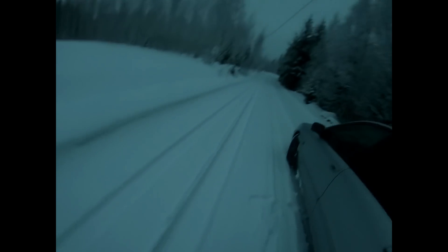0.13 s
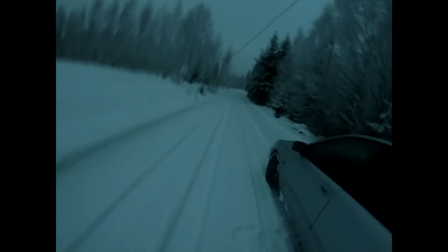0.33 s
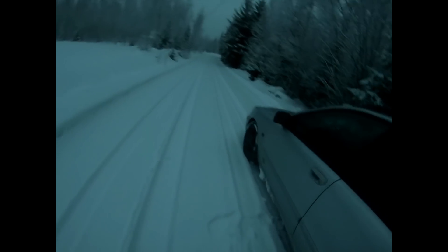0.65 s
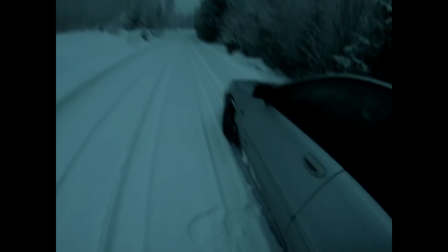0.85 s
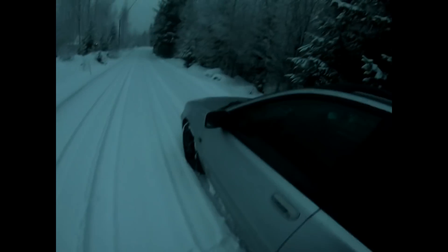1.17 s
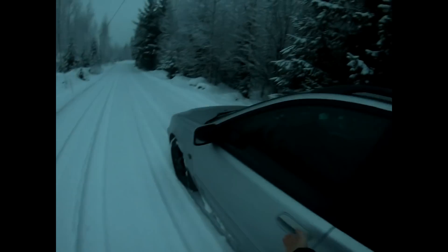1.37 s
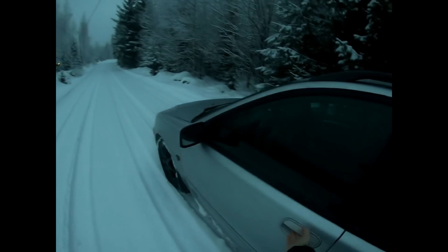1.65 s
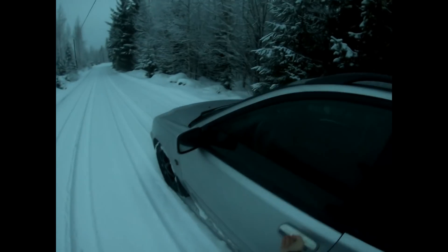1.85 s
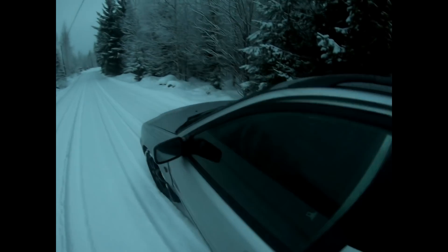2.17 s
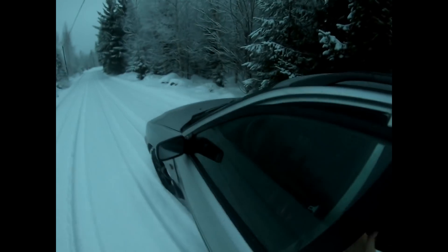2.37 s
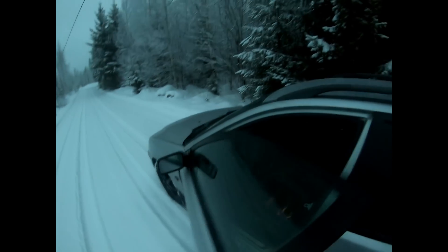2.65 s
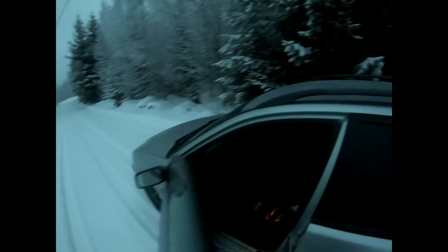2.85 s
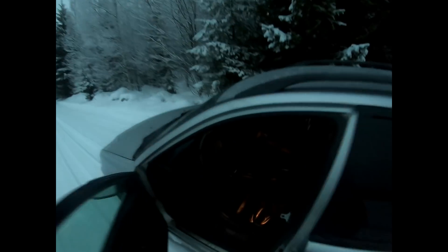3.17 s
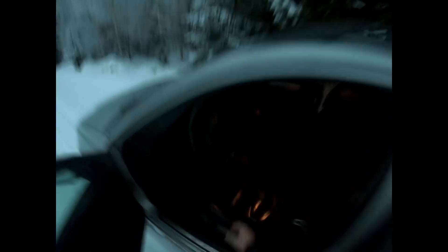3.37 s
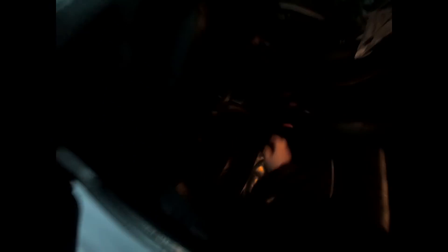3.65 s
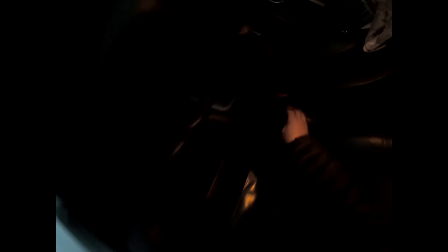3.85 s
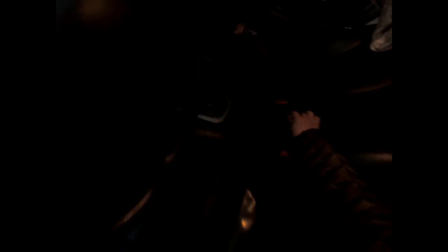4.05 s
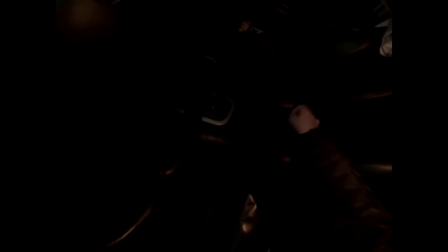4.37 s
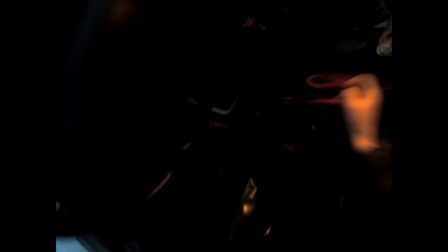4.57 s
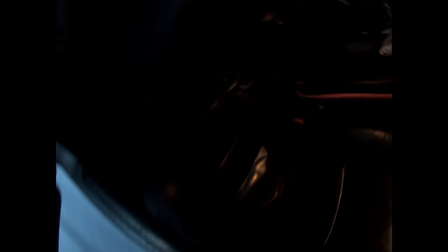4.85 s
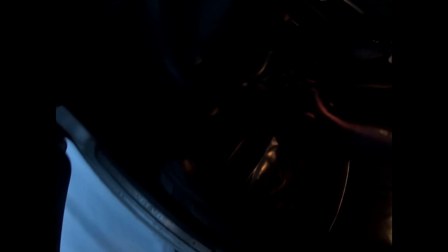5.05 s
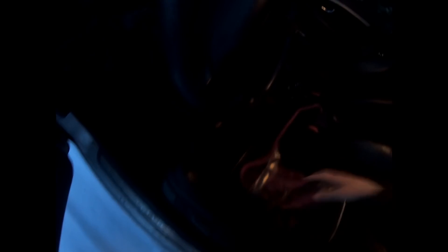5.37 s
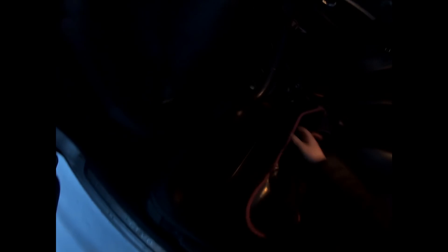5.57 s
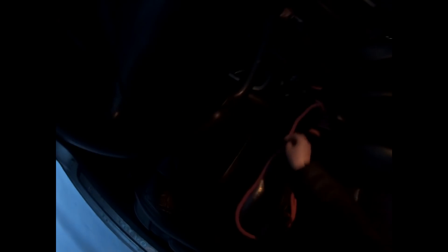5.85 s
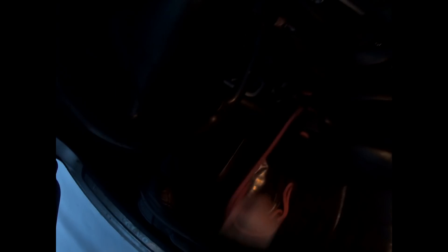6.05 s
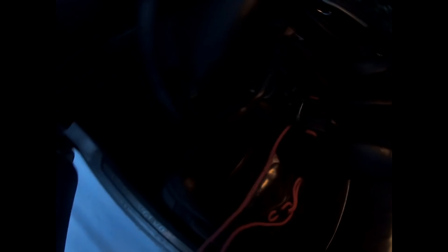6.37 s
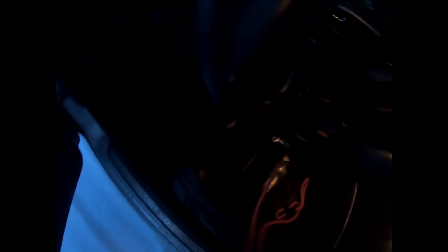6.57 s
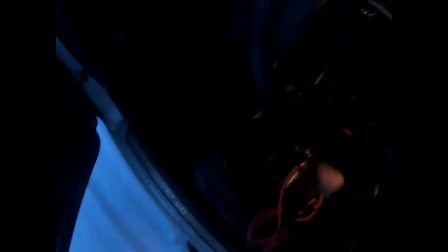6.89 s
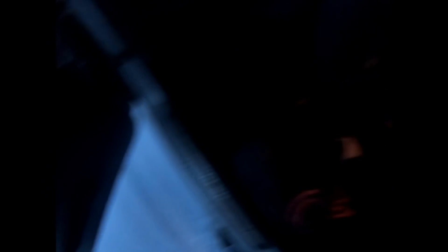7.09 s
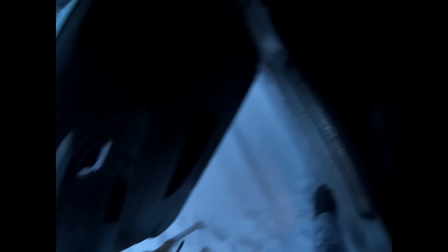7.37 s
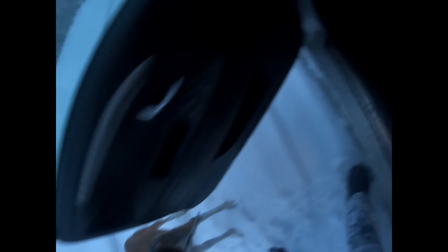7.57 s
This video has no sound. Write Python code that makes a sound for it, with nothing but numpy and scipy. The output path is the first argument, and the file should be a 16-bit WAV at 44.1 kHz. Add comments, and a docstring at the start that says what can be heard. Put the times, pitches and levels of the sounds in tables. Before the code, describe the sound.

Soft steps in snow and a swishing jacket are heard close on a body-worn microphone, with low rumble from each movement and very quiet surroundings. A dog gives faint, high whimpers at about 0.2 and 1 second. At 2 seconds a car door handle clunks, and at 2.3 the latch releases with a sharp click and a short boom. From 2.8 to 3.4 seconds the dog whines in a thin, wavering whistle, slightly to the right, while the door groans faintly. The jacket rustles more strongly around 4 seconds. From 4.4 seconds paws and a lead knock and scrape busily on the car's trim and floor, loudest near 4.8 and in a dull double thump at 5.6. The lead's metal clasp jingles from 6.3 to 6.9 seconds. Faint whimpers follow between 7 and 7.5 seconds, then one last clink.

```python
"""On a snowy forest road, someone wearing a camera walks to a car, pulls the door open and leans in.
A dog whines through its nose in high, nearly pure whistles. Steps, paws and lead strike trim and floor
into damped resonance, the door skin booms, and the lead's metal clasp jingles in the footwell.
Friction makes the jacket swish, and the camera mount carries every move to the microphones as rumble."""
import sys
import numpy as np
from scipy import signal
from scipy.io import wavfile
from scipy.ndimage import uniform_filter1d

SR = 44100
rng = np.random.default_rng(int(sys.argv[2]) if len(sys.argv) > 2 else 0)


def wav_record(signal):
    """Record a signal, one row per channel, as 16-bit PCM in the file named by sys.argv[1]."""
    frames = np.transpose(np.atleast_2d(signal))
    bounded = np.clip(frames, -1, 1)
    # unit amplitude maps onto the largest positive 16-bit level
    quanta = np.round(bounded * 32767).astype(np.int16)
    wavfile.write(sys.argv[1], SR, quanta)


N = 340893

# the side on which the action lies: (time [s], left minus right [dB])
BALANCE = [(0, -4.5), (2, -12), (2.9, -17.5), (3.4, -10), (4.4, -1), (7.73, -3)]


def dog():
    """Nasal whistling: a long whine, amplitude-modulated into throbs midway, and shorter whimpers."""
    # the long whine: (time [s], pitch [Hz], level [dB])
    whine = [(2.858, 4590, -64), (2.872, 4500, -54), (2.938, 4503, -49), (2.982, 4385, -63),
             (3.019, 4420, -62), (3.095, 4675, -56), (3.136, 4630, -54), (3.168, 4490, -44),
             (3.190, 4520, -46), (3.206, 4710, -48), (3.234, 4640, -51), (3.245, 4590, -68),
             (3.275, 4500, -54), (3.31, 4433, -43), (3.336, 4435, -42.5), (3.352, 4627, -46),
             (3.378, 4700, -43), (3.394, 4580, -48), (3.41, 4589, -44), (3.43, 4630, -80)]
    # an early, wavering whine: (time [s], pitch [Hz], level [dB])
    waver = [(0.998, 4560, -72), (1.046, 4432, -61), (1.076, 4474, -65), (1.094, 4498, -59),
             (1.116, 4372, -57), (1.175, 4360, -72)]
    # (start [s], length [s], first pitch [Hz], last pitch [Hz], level [dB], octave [dB], rise [share])
    whimpers = [(0.156, 0.064, 4600, 4160, -51, -87, 1), (2.83, 0.045, 4880, 5200, -52.5, -82, 0.68),
                (7.002, 0.091, 4740, 4730, -81, -64.5, 0.39),
                (7.055, 0.177, 4130, 4050, -55.5, -64.5, 0.56), (7.369, 0.13, 4410, 4150, -51.5, -63, 0.25)]
    out, pan_db = np.zeros((2, N)), -6
    # the octave follows part of each swell and weakens as the pitch climbs
    with_octave = [(s, hz, db, -64 + 0.35 * (db + 43) - 0.0317 * (hz - 4644)) for s, hz, db in whine]
    start, tone = whistle(with_octave, wobble=0.0022, sway_db=1.5, alias_db=-3)
    t = start + np.arange(len(tone)) / SR
    from_s, to_s, throb_hz = 3.025, 3.25, 41.5
    throbs = (t > from_s) * (t < to_s) * np.cos(np.pi * throb_hz * (t - from_s)) ** 4
    add(out, start, tone * gain_of(-11 * uniform_filter1d(throbs, size=100)), pan_db)
    add(out, *whistle(waver, wobble=0.0049), pan_db)
    for row in whimpers:
        add(out, *whistle(whimper(*row), wobble=0.008), pan_db)
    return out


def whimper(start, length, first_hz, last_hz, db, octave_db, rise):
    """Contour of a linear glide: the fundamental swells and fades while the octave dips slightly."""
    u, rise = np.linspace(0, 1, num=13), np.clip(rise, .1, .9)
    off_peak = np.where(u < rise, (rise - u) / rise, (u - rise) / (1 - rise)) ** 0.52
    pitch = first_hz + u * (last_hz - first_hz)
    return np.transpose([start + u * length, pitch, db - 14 * off_peak, octave_db + 3 * off_peak])


def whistle(rows, wobble, sway_db=2.5, alias_db=-200):
    """An oscillation with random pitch and amplitude modulation, one harmonic for each level column."""
    s, hz, *levels_db = np.transpose(rows)
    t = np.arange(s[0], s[-1], 1 / SR)
    drift, sway = (evened(uniform_filter1d(uniform_filter1d(v, size=400), size=400))
                   for v in rng.standard_normal((2, len(t))))
    pitch = uniform_filter1d(np.interp(t, s, hz), size=400) * (1 + wobble * drift)
    cycles = np.cumsum(pitch) / SR
    gains = [gain_of(np.interp(t, s, db)) for db in levels_db]
    tone = sum(gain * np.sin(2 * np.pi * k * cycles) for k, gain in enumerate(gains, 1))
    alias_rate_hz = 24100  # the recorder aliases the octave into a faint, thin tone near 15 kHz
    tone += gains[-1] * gain_of(alias_db) * np.sin(2 * np.pi * (alias_rate_hz * t - 2 * cycles))
    ends = np.clip(np.minimum(t - s[0], s[-1] - t) / 0.0021, 0, 1)
    rasp = 1 + 0.07 * evened(uniform_filter1d(rng.standard_normal(len(t)), size=60))
    return s[0], np.sqrt(2) * tone * gain_of(sway_db * sway) * rasp * ends


def knocks():
    """Impact excitation: each blow rings the struck part, with a scuff, a crack and a thump of weight."""
    # steps, paws and lead on trim and floor:
    # (time [s], level [dB], resonance [Hz], contact t60 [s], relative thump [dB], relative crack [dB])
    blows = [(0.222, -43, 770, 0.065, -28, 0.5), (0.283, -49.5, 473, 0.038, -4, -20),
             (0.404, -39.5, 397, 0.035, -32, -1.5), (0.62, -42.5, 281, 0.02, -41, -12),
             (0.689, -45.5, 337, 0.046, -8.5, -3.5), (0.9, -41, 390, 0.022, -3, -2.5),
             (1.105, -42.5, 271, 0.034, -30, -3), (1.84, -49.5, 1140, 0.2, -2.5, 0.5),
             (1.894, -46, 316, 0.29, -21, 5), (1.965, -27, 348, 0.17, -4.5, -8.5),
             (2.126, -43.5, 557, 0.1, -18, -28), (2.272, -37, 347, 0.38, -22, -4.5),
             (2.309, -29.5, 1860, 0.015, 3, 11.5), (2.643, -43.5, 488, 0.15, 0, -24),
             (2.969, -45, 330, 0.022, -4.5, -24), (3.102, -48, 530, 0.1, -34, -7),
             (3.197, -42.5, 405, 0.039, -36, 5.5), (3.257, -44.5, 366, 0.038, -15, -22),
             (3.278, -41, 271, 0.06, -42, 2), (3.509, -44.5, 263, 0.041, -13, -12),
             (3.712, -44.5, 314, 0.16, -8, 3), (4.197, -39.5, 263, 0.07, -8, -30),
             (4.369, -39.5, 1480, 0.081, -9, -12), (4.482, -46.5, 325, 0.065, -9, 9.5),
             (4.502, -39, 280, 0.14, 2, 9), (4.559, -42, 480, 0.11, -11, 9),
             (4.603, -30, 625, 0.11, -7, -2.5), (4.648, -37, 1480, 0.13, -2.5, 6),
             (4.675, -29.5, 2600, 0.054, -38, -6), (4.699, -24, 773, 0.09, -14, -3.5),
             (4.737, -24.5, 1510, 0.051, -40, -4), (4.783, -35.5, 590, 0.25, -21, -2),
             (4.823, -35, 925, 0.029, -20, 4), (4.847, -16.5, 620, 0.064, -8.5, -18),
             (4.863, -33, 493, 0.035, -15, 4.5), (4.924, -41, 2670, 0.034, 3.5, 8),
             (4.945, -23.5, 1520, 0.029, -52, -38), (5.013, -42.5, 1180, 0.025, 1.5, 10),
             (5.043, -28.5, 1240, 0.036, -38, -1.5), (5.076, -33, 1570, 0.064, -31, -25),
             (5.104, -33, 526, 0.053, -9, 2), (5.119, -27, 272, 0.059, -14, 1),
             (5.1956, -27.5, 2200, 0.037, -29, 2.5), (5.218, -30, 1160, 0.13, -24, -21),
             (5.299, -28, 305, 0.1, -11, -3), (5.381, -32.5, 1280, 0.18, -8.5, 5.5),
             (5.398, -28.5, 1350, 0.072, -16, -1), (5.512, -28, 207, 0.053, 3, -4.5),
             (5.553, -36, 273, 0.073, -18.5, -3.5), (5.568, -25.5, 1570, 0.054, -37, 1.5),
             (5.585, -19, 142, 0.088, -14, -10), (5.606, -14.5, 132.5, 0.077, -6, -11),
             (5.744, -39.5, 1420, 0.023, -20, -18), (5.77, -38, 1275, 0.16, -4, -1.5),
             (5.897, -34, 1370, 0.096, -10, -6), (5.994, -34, 1550, 0.043, -11.5, -2.5),
             (6.139, -35, 1345, 0.026, -30, -1), (6.232, -40.5, 373, 0.07, -6, 0.5),
             (6.332, -29.5, 262, 0.083, -13, -4.5), (6.563, -38.5, 675, 0.026, 2, -14),
             (6.61, -40, 1740, 0.046, 8.5, 11.5), (6.675, -38, 272, 0.049, -3.5, 11),
             (6.75, -37.5, 940, 0.05, 2, 2), (6.811, -49.5, 353, 0.15, 10, 10.5),
             (7.082, -49.5, 275, 0.11, 8.5, 1)]
    out, t = np.zeros((2, N)), np.arange(6500) / SR
    draws = rng.standard_normal((len(blows), 4, 2, len(t)))
    draws[:, :, 1] = 0.76 * draws[:, :, 0] + 0.5 * draws[:, :, 1]  # partly coherent at the two ports
    for (s, db, hz, t60, thump_db, crack_db), (a, b, c, d) in zip(blows, draws):
        rise = np.minimum(t / (0.00043 + 0.27 * t60 ** 2), 1)  # long contacts are scrapes that build up
        stutter = gain_of(4.83 * evened(uniform_filter1d(a[1], size=150)))  # stick and slip
        contact = gain_of(-60 * t / t60) * rise * stutter
        strike = 1.07 * (t == 0) * np.linalg.norm(contact) * (0.035 / t60)  # short contacts start hard
        mode = np.sin(2 * np.pi * hz * t) * gain_of(-60 * t * (hz / 58 + 2 / t60)) * rise
        hollow = band(a[0] * contact + strike, 0.734 * hz, 1.107 * hz)
        hollow = peaked(band(hollow, 0.83 * hz, 1.88 * hz))
        upper = peaked(band(c * contact + strike, 2.22 * hz, 2.63 * hz))
        scuff = peaked(band(b * contact + strike, .5 * hz, 2 * hz))
        body = peaked(1.08 * mode + 0.89 * hollow + 0.18 * upper + scuff)
        thump = peaked(band((c[0] + 5.5 * (t == 0)) * gain_of(-60 * t / 0.11), 119.5, 231))
        crack = band(d * contact ** 1.04 + 0.18 * strike, 400, 2990)
        crack = peaked(crack + 0.17 * band(d * contact ** 1.2, 2100, 10700))
        pan_db = np.interp(s, *np.transpose(BALANCE)) * min(hz / 900, 1)  # bass reaches both ports alike
        add(out, s, gain_of(db) * (body + gain_of(crack_db) * crack), pan_db)
        add(out, s, gain_of(db + thump_db) * thump)
    return out


def door():
    """Panel resonance: handle and latch set the door skin booming and its linkage rattling."""
    # handle, then latch: (time [s], level [dB])
    blows = [(1.966, -33), (2.313, -32)]
    # modes of the door skin: (frequency [Hz], level [dB], t60 [s])
    skin_modes = [(142, 0, 0.21), (305.6, -15, 0.25), (558, -5, 0.14)]
    out, t = np.zeros((2, N)), np.arange(16000) / SR
    for s, db in blows:
        force = rng.standard_normal(len(t)) * gain_of(-60 * t / 0.13)
        add(out, s, gain_of(db) * resonate(skin_modes, force, spread_db=2.5))
        decay = gain_of(-60 * t / 0.071) + 0.062 * gain_of(-60 * t / 0.5)
        rattle = peaked(band(rng.standard_normal((2, len(t))) * decay, 357, 1350))
        add(out, s, gain_of(db + 10) * rattle, pan_db=-5)
    return out


def door_groan():
    """The door check groans in a low, falling tone with random frequency modulation."""
    # (time [s], pitch [Hz], level [dB])
    groan = [(3.0, 236, -67), (3.078, 191.3, -51.5), (3.15, 182, -70)]
    out = np.zeros((2, N))
    add(out, *whistle(groan, wobble=0.018, sway_db=0))
    return out


def clasp():
    """Modal ringing: metal parts collide at each jerk of the lead, favouring the struck part's modes."""
    # (time [s], level [dB], pitch of the struck part [Hz])
    jingles = [(6.2742, -34.5, 6470), (6.318, -38, 6460), (6.338, -41, 7500), (6.36, -45.5, 6700),
               (6.46, -40.5, 6570), (6.6131, -33.5, 3330), (6.654, -36, 6700), (6.677, -27, 8200),
               (6.691, -46, 8450), (6.722, -47, 6660), (6.7558, -22.5, 6900), (6.821, -40, 6630),
               (6.838, -46, 6650), (6.881, -46, 6500), (7.71, -34, 7900)]
    # modes of the clasp: (frequency [Hz], level [dB], t60 [s])
    metal_modes = [(3330, 1.5, 0.018), (4640, 0, 0.03), (6690, 0, 0.028), (7520, 2, 0.022), (8400, 2, 0.02),
                   (8970, -2, 0.022)]
    out, t = np.zeros((2, N)), np.arange(4000) / SR
    for (s, db, struck_hz), white in zip(jingles, rng.standard_normal((len(jingles), 2, len(t)))):
        chatter = peaked(band(white * gain_of(-60 * t / 0.03), 4360, 10700))
        contacts = white[0] ** 3 * gain_of(-60 * t / 0.072)  # cubing leaves separate spikes
        modes = [(hz * (1 + 0.012 * rng.standard_normal()),
                  mode_db - 12.6 * abs(np.log2(hz / struck_hz)), t60) for hz, mode_db, t60 in metal_modes]
        jingle = peaked(resonate(modes, contacts, spread_db=6.5) + 1.03 * chatter)
        sparkle = band(white[::-1] * gain_of(-60 * t / 0.087), 8600, 19000)
        sparkle = peaked(band(sparkle, 12400, 18000))
        add(out, s, gain_of(db) * (jingle + 2.2 * sparkle))
    return out


def ticks():
    """Broadband transients: ice, zip and seal snap with no resonant body."""
    # (time [s], peak level [dB], band frequency [Hz], left minus right [dB])
    snaps = [(0.0854, -34, 4200, -6), (0.1345, -39, 8000, 18), (0.614, -47, 8000, -18),
             (0.647, -48, 9000, -13), (0.761, -50, 7000, -12), (1.407, -44, 6400, -15),
             (1.721, -25.5, 10300, 16.5), (2.247, -45, 8000, 10), (2.307, -17, 8100, 2),
             (2.433, -50, 8500, -3), (2.471, -41, 9000, -4), (3.887, -37.5, 6500, -12),
             (5.182, -38, 10000, 0), (5.3017, -31.5, 6200, 2), (7.0303, -29.5, 8800, -4)]
    out, t = np.zeros((2, N)), np.arange(3000) / SR
    for (s, db, hz, pan_db), white in zip(snaps, rng.standard_normal((len(snaps), 2, len(t)))):
        burst = (white + 1.4 * white[::-1]) * gain_of(-60 * t / 0.0097)  # partly alike at the two ports
        edges = 0.66 * hz, 2.74 * hz
        add(out, s, gain_of(db) * peaked(band(band(burst, *edges), *edges)), pan_db)
    return out


def jacket():
    """Friction noise: fibres slip in a crackling swish; heavier rubbing on seat and snow sounds dull."""
    # moving cloth: (time [s], swish level [dB], dull level [dB])
    rubbing = [(0.0, -54.5, -58.5), (0.24, -70.5, -76), (0.45, -59.5, -56), (0.8, -67.5, -84),
               (0.86, -58.5, -70), (1.5, -60.5, -64), (1.8, -91, -63), (2.25, -64.5, -63),
               (2.7, -73.5, -71), (3.1, -68, -63), (3.64, -62, -66.5), (3.93, -50, -45), (4.08, -49, -44.5),
               (4.28, -54.5, -72), (4.45, -56.5, -61), (4.69, -54.5, -53), (5.0, -52.5, -61.5),
               (5.49, -56, -49), (5.92, -60.5, -59.5), (6.15, -54.5, -61.5), (6.69, -64.5, -63),
               (7.04, -59.5, -63.5), (7.73, -59, -63.5)]
    # scuffs of boot and sleeve: (peak time [s], length [s], swish level [dB], dull level [dB])
    scuffs = [(0.195, 0.17, -56.5, -71), (0.9, 0.25, -83, -58), (1.62, 0.59, -62, -64),
              (4.53, 0.091, -54, -59), (4.69, 0.11, -56, -71), (5.22, 0.2, -58.5, -46.5),
              (6.3, 0.42, -63, -48), (6.66, 0.14, -56, -75), (7.43, 0.43, -59.5, -83)]
    # light and heavy rubbing: (frequency [Hz], relative density [dB])
    swish_spectrum = [(250, -8.5), (500, -3), (1200, -1.5), (3000, -7), (4000, -12.5), (6000, -11),
                      (9000, -12.5)]
    dull_spectrum = [(100, -82), (140, 7), (200, 14), (400, 2), (1500, -18.5)]
    # the weave sings on a long stroke: (frequency [Hz], width [Hz], relative level [dB])
    weave_peaks = [(2200, 330, -15.5), (3050, 680, -15), (5700, 2000, -21)]
    # strength of that singing: (time [s], relative level [dB])
    stroke = [(0.12, -7), (0.2, 1), (0.27, -14.5), (3.6, -14.5), (3.78, -2), (4.15, -4.5), (4.32, -12)]
    slips = gain_of(3.7 * np.minimum(rng.exponential(1, N), 5)) * (rng.random(N) < 200 / SR)
    crackle = 1 + 0.11 * signal.oaconvolve(slips, np.exp(-np.arange(400) / 53))[:N]
    swish = evened(noise(swish_spectrum, patchy_db=2.5, flicker_db=2.2) * crackle)
    hz = np.geomspace(1000, 12000, num=200)
    power = sum(gain_of(2 * db) / (1 + (2 * (hz - f) / width) ** 2) ** 2 for f, width, db in weave_peaks)
    weave = noise(list(zip(hz, 10 * np.log10(power))), patchy_db=2, flicker_db=3)
    swish += gain_of(curve(stroke)) * weave
    dull = noise(dull_spectrum, patchy_db=3.5, flicker_db=2.5, size=1024)
    pan = gain_of(np.outer([.5, -.5], curve(BALANCE)))
    swish_gain = gain_of(curve(rubbing)) + humps(scuffs, column=2)
    dull_gain = gain_of(curve(rubbing, column=2)) + humps(scuffs, column=3)
    return pan * swish * swish_gain + dull * dull_gain


def camera_mount():
    """Structure-borne sound: sways and bumps reach the microphones through the case as rumble."""
    # (peak time [s], length [s], sway level [dB], bump level [dB])
    jolts = [(0.05, 0.25, -60, -61.5), (0.43, 0.07, -48, -71), (0.52, 0.15, -60, -41.5),
             (0.715, 0.079, -74, -53), (0.925, 0.24, -49.5, -45.5), (1.14, 0.034, -56, -75),
             (1.98, 0.22, -49, -51), (2.34, 0.17, -67, -46.5), (3.65, 0.43, -44.5, -46),
             (4.22, 0.16, -71, -47.5), (4.6, 0.45, -61, -49), (4.86, 0.21, -50, -60),
             (5.2, 0.48, -50.5, -57), (5.75, 0.24, -52, -44.5), (5.92, 0.18, -56, -45.5),
             (6.17, 0.18, -54, -63), (6.38, 0.12, -69, -42), (6.57, 0.19, -62, -44),
             (6.76, 0.38, -48, -42.5), (7.11, 0.08, -67, -50.5), (7.42, 0.23, -64, -63.5),
             (7.65, 0.11, -66, -45)]
    # deep sway and higher bump: (frequency [Hz], relative density [dB])
    sway_spectrum = [(15, 2), (30, 3), (55, 14), (80, -23), (150, -57)]
    bump_spectrum = [(30, -23), (60, -4), (125, 1.5), (170, -28), (250, -72)]
    rest_db = -103
    sway = noise(sway_spectrum, patchy_db=2, flicker_db=2.5, size=2048)
    bump = noise(bump_spectrum, patchy_db=3.5, flicker_db=2.5, size=1024)
    return (gain_of(rest_db) + humps(jolts, column=2)) * sway + humps(jolts, column=3) * bump


def sliding_lead(hz=1480):
    """Friction noise of the sliding lead, heard faintly through one narrow resonance."""
    # (time [s], level [dB])
    slide = [(6.55, -77), (6.65, -62), (7.12, -65), (7.22, -92)]
    resonance = [(.82 * hz, -40), (.92 * hz, 0), (1.08 * hz, 0), (1.2 * hz, -40)]
    return gain_of(curve(slide)) * noise(resonance, patchy_db=1.5, flicker_db=3.5)


def cabin(x, taps_per_s=2000, t60=0.04):
    """Early reflections in the open car, quickly absorbed by padding and different at each port."""
    t = np.arange(5000) / SR
    taps = rng.choice([-1., 1.], (2, len(t))) * (rng.random((2, len(t))) < taps_per_s / SR) * (t > .002)
    taps = band(taps * gain_of(-60 * t / t60), 680, 11300)
    return signal.fftconvolve(x.mean(0)[None], taps / np.linalg.norm(taps[0]), axes=1)[:, :N]


def air():
    """Ambient noise: a faint broadband hush."""
    # (frequency [Hz], relative density [dB])
    spectrum = [(100, -43), (150, -10), (700, 11), (3000, 6), (4000, -6), (9000, -5)]
    return gain_of(-78.5) * noise(spectrum, patchy_db=3, flicker_db=2, size=1024)


def noise(spectrum, patchy_db, flicker_db, size=512):
    """Partly coherent stereo noise with drifting spectral patches and a flicker common to all bands."""
    # (frequency [Hz], left-right correlation [ratio])
    coherence = [(25, 0.4), (60, 0.97), (200, 0.94), (600, 0.68), (1600, 0.025), (9000, 0.78)]
    hop = size // 4
    frames, hz = N // hop + 5, np.fft.rfftfreq(size, 1 / SR)
    a, b, c, d, patches = rng.standard_normal((frames, len(hz), 5)).T
    patches = evened(uniform_filter1d(uniform_filter1d(patches, size=8, axis=0), size=12, axis=1))
    flicker = evened(uniform_filter1d(rng.standard_normal(frames), size=3))
    shared = at_frequency(coherence, hz)[:, None]
    left = a + 1j * b
    right = shared * left + np.sqrt(1 - shared ** 2) * (c + 1j * d)
    gain = gain_of(at_frequency(spectrum, hz)[:, None] + patchy_db * patches + flicker_db * flicker)
    _, sound = signal.istft(np.array([left, right]) * gain, nperseg=size, noverlap=size - hop)
    return evened(sound[:, :N])


def resonate(modes, force, spread_db):
    """Modal superposition: a force drives damped sinusoids whose strengths vary from blow to blow."""
    t = np.arange(len(force)) / SR
    ring = sum(gain_of(db + spread_db * rng.standard_normal() - 60 * t / t60) * np.sin(2 * np.pi * hz * t)
               for hz, db, t60 in modes)
    return peaked(signal.fftconvolve(force, ring)[:len(t)])


def humps(rows, column, rise_share=0.47, ends_db=-23.5):
    """Summed rise-and-fall envelopes, one for each row of (peak time [s], length [s], levels [dB])."""
    t, out = np.arange(N) / SR, np.zeros(N)
    for row in rows:
        lo, hi = (int(np.clip((row[0] + k * row[1]) * SR, 0, N)) for k in (-2, 2))
        u = (t[lo:hi] - row[0]) / row[1]
        off_peak = np.where(u < 0, -u / rise_share, u / (1 - rise_share))
        out[lo:hi] += gain_of(row[column] + ends_db * off_peak ** 2.05)
    return out


def gain_of(db):
    return 10 ** (np.asarray(db) / 20)


def evened(x):
    return x / np.sqrt(np.mean(x ** 2) + 1e-20)


def peaked(x):
    return x / (abs(x).max() + 1e-20)


def at_frequency(points, hz):
    f, value = np.transpose(points)
    return np.interp(np.log(hz + 1), np.log(f + 1), value)


def curve(rows, column=1):
    return np.interp(np.arange(N) / SR, [r[0] for r in rows], [r[column] for r in rows])


def add(mix, s, sound, pan_db=0):
    part = mix[:, round(s * SR):][:, :sound.shape[-1]]
    part += sound[..., :part.shape[1]] * gain_of([[pan_db / 2], [-pan_db / 2]])


def band(x, lo_hz, hi_hz):
    return signal.sosfilt(signal.butter(2, [lo_hz, min(hi_hz, 20000)], "bandpass", fs=SR, output="sos"), x)


def scene():
    """Superposition of all sources; only the impacts are reflected in the cabin."""
    impacts = knocks() + door() + ticks() + clasp()
    hush = air()
    reflections = gain_of(-8.5) * cabin(impacts)
    return impacts + reflections + dog() + door_groan() + jacket() + sliding_lead() + camera_mount() + hush


def record(dry, cutoff_hz=15800):
    """Low-pass filtering: the microphones lose the top treble, and a steep band limit follows."""
    # microphone response: (frequency [Hz], gain [dB])
    response = [(8800, 1), (10300, -11), (11500, -19.5), (16000, -26)]
    hz = np.linspace(0, SR / 2, num=257)
    colour = signal.firwin2(255, hz, gain_of(at_frequency(response, hz)), fs=SR)
    edge = signal.firwin(511, cutoff_hz, window=("kaiser", 9), fs=SR)
    return signal.oaconvolve(dry, np.convolve(colour, edge)[None], "same")


dry = scene()
out = record(dry)
wav_record(out)
```